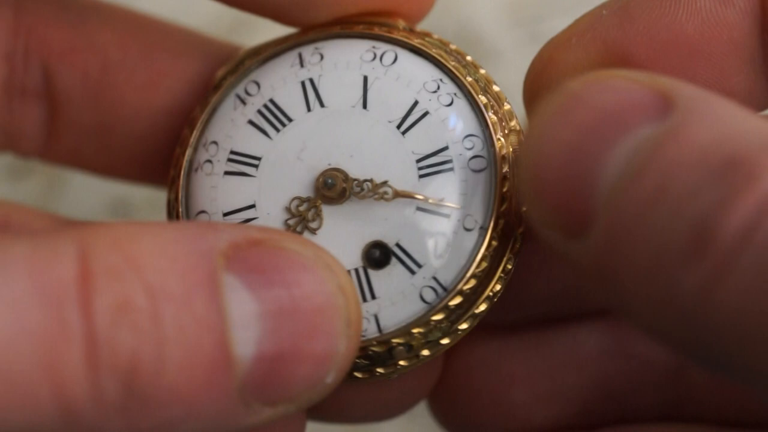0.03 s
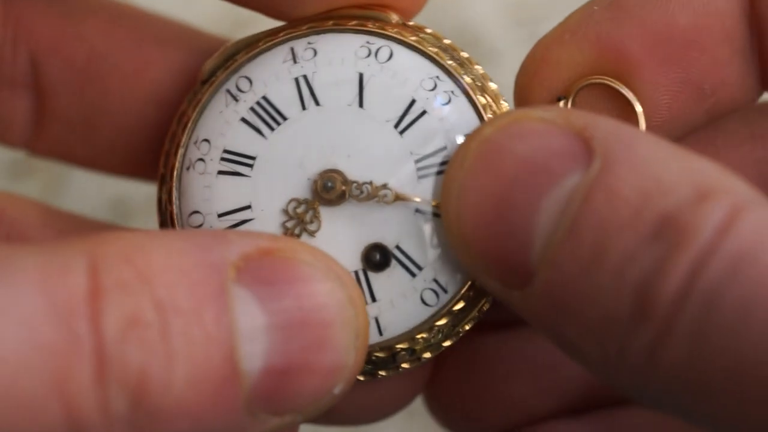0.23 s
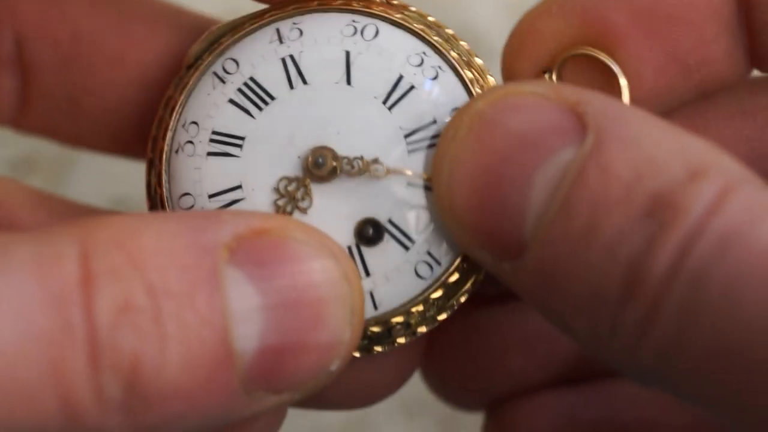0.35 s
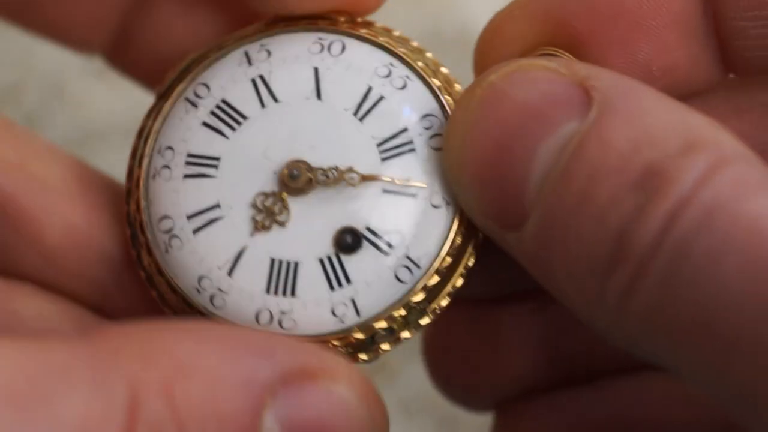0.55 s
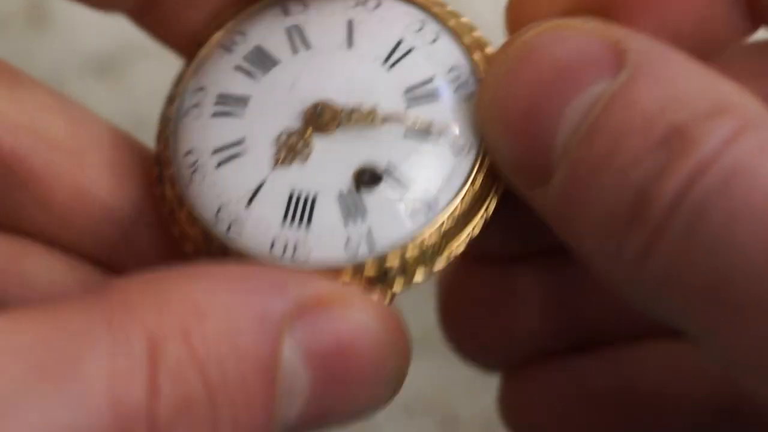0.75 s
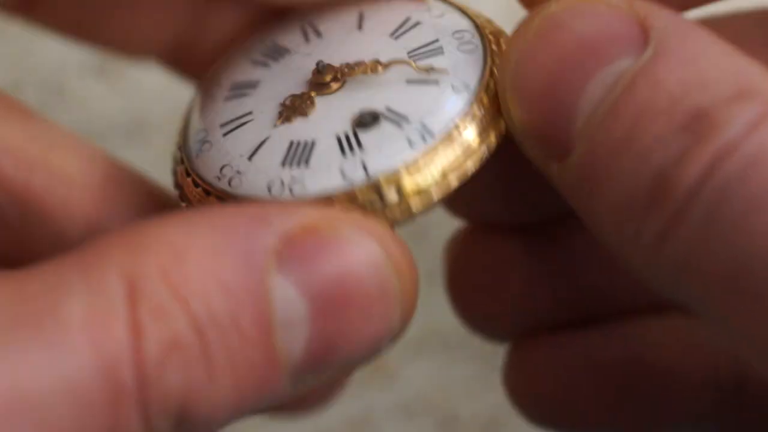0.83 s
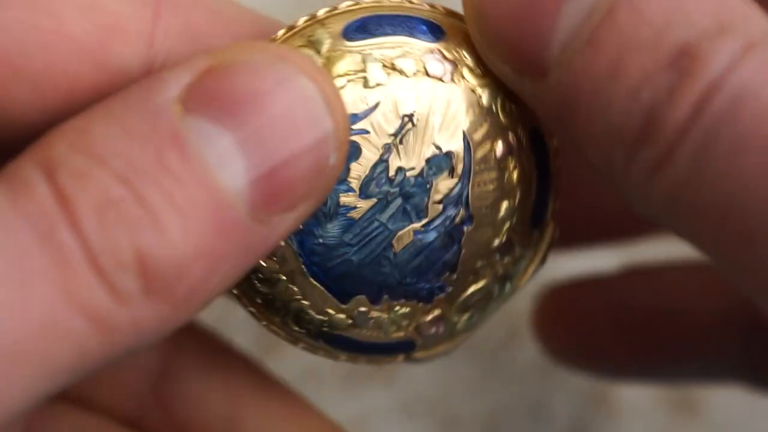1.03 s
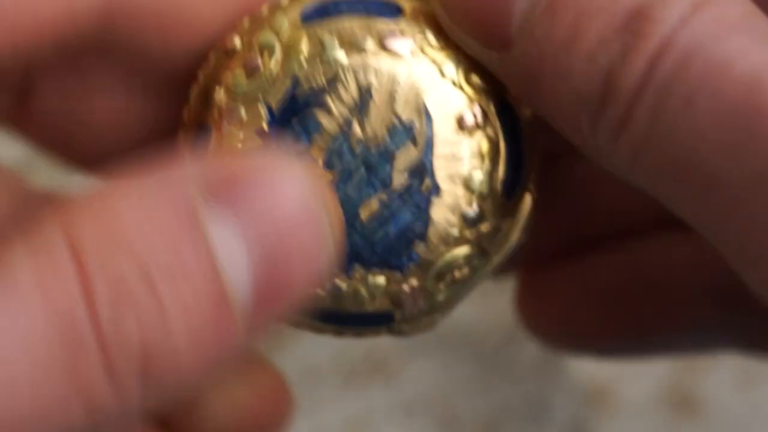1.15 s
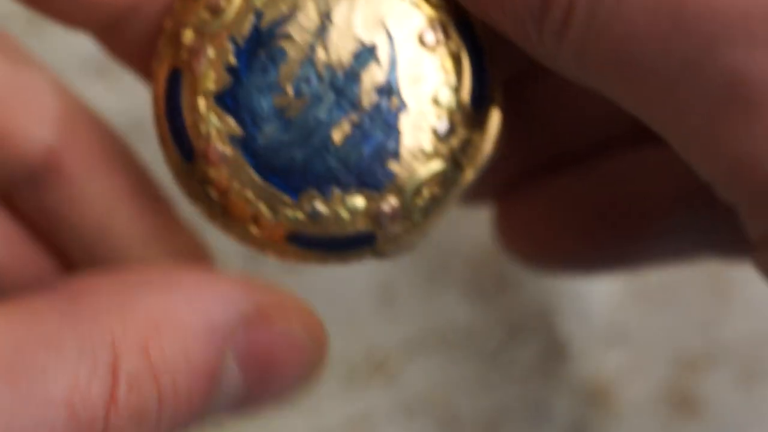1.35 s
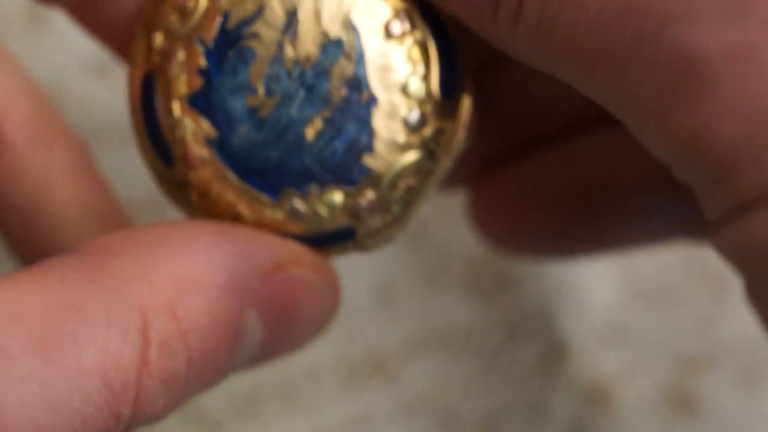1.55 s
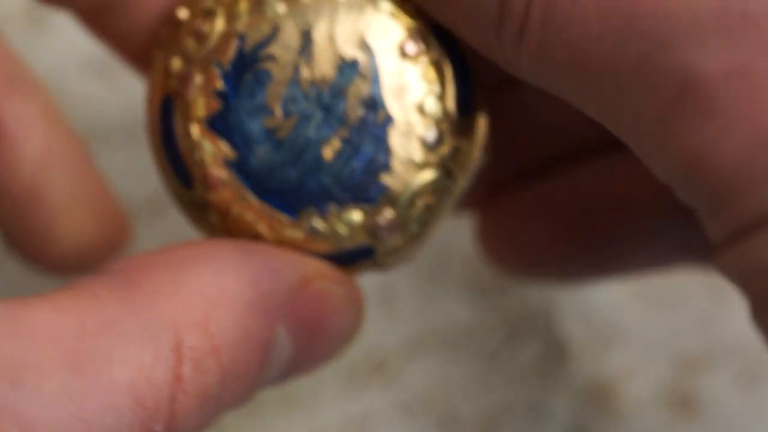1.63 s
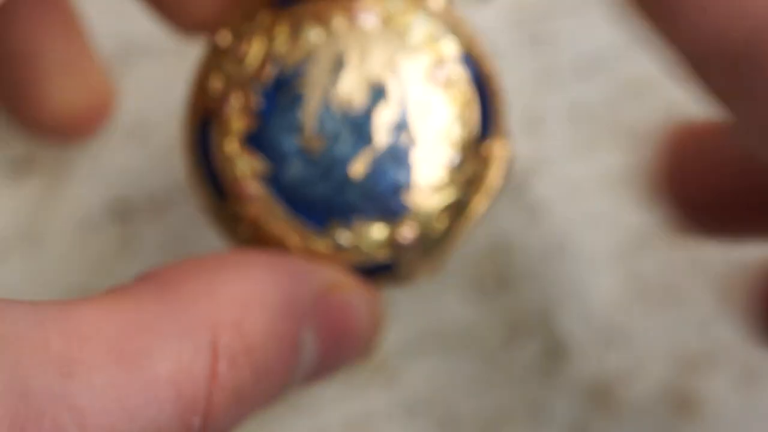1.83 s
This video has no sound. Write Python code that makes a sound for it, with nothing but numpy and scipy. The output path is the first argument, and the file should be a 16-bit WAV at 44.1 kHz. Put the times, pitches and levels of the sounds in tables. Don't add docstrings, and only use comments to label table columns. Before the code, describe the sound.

One crisp watch-case snap close to the microphone in a quiet indoor room, then near silence with soft hiss, delicate metallic ticks around the middle, and a small rim knock with skin rubbing at the end.

```python
import sys
import numpy as np
from scipy import signal
from scipy.fft import rfft, irfft
from scipy.io import wavfile
from scipy.ndimage import uniform_filter1d

SR = 44100
rng = np.random.default_rng(int(sys.argv[2]) if len(sys.argv) > 2 else 0)


def waveform_to_disk(signal):
    frames = np.transpose(np.atleast_2d(signal))
    scaled = np.clip(frames, -1, 1) * 32767
    samples = np.round(scaled).astype(np.int16)
    wavfile.write(sys.argv[1], SR, samples)


def volts_from_decibels(level):
    exponent = np.asarray(level, float) / 20
    return 10 ** exponent


N = 83790

# (frequency [Hz], width [Hz], level [dB])
CASE_MODES = [(670, 112, 3.5), (1050, 95, -19), (1530, 81, -7.5), (1760, 110, 1), (2680, 180, -9),
              (3440, 480, -13), (3664, 320, 1), (4700, 250, -10), (5250, 76, -4.5), (6660, 95, -4.5),
              (7370, 200, -1.5), (8730, 760, -3), (9200, 560, -1), (810, 160, -16)]
GLASS_MODES = [(4100, 500, -2), (10400, 600, 0), (11700, 500, 2), (13300, 700, -2), (15300, 600, -3)]
CATCH_MODES = [(8070, 190, -7), (7970, 270, 1), (8940, 400, 7), (10250, 240, -5), (12600, 560, -5),
               (14000, 500, -6), (5000, 1300, -3.5)]
BOW_MODES = [(5800, 440, 6.5), (6700, 310, 5), (7500, 310, 8), (8250, 410, 4.5), (9340, 170, 1.5),
             (10000, 200, 2), (10700, 460, 1), (11700, 190, 3), (12200, 790, -12), (14600, 1100, 7)]
CROWN_MODES = [(1600, 330, -4), (3500, 550, -1), (4750, 300, -1), (6600, 390, 5), (7660, 250, 5),
               (9000, 250, 3), (10200, 320, 0.5), (13200, 370, 0), (14200, 300, -5)]
RIM_MODES = [(3920, 130, -8), (5610, 350, -2), (6500, 550, 3), (7250, 350, 2), (8730, 400, -2),
             (4750, 300, -7), (2900, 1400, -10), (9800, 600, -2), (11200, 800, 1), (13000, 700, -1),
             (14800, 800, 5), (15500, 600, 1)]
BODY_MODES = [(1320, 200, -1), (1780, 300, 4), (3500, 350, 7), (4000, 300, 5)]
SHELL_MODES = [(950, 250, 0), (1650, 600, 1), (2350, 600, 2)]
LOOP_MODES = [(5720, 14, 3), (9100, 70, -3)]
PIN_MODES = [(7465, 26, 2), (11500, 70, -4), (10100, 70, -6), (6650, 80, -4), (3700, 120, -5)]

# (time [s], strength [dB], left minus right [dB])
CASE_HITS = [
    (.22056, -20.5, 0),
    (.2222, -28, 4),
    (.224, -35, 5),
]
GLASS_HITS = [
    (.22056, -36, 0),
    (.2222, -34, -3),
    (.223, -38, -3),
    (.224, -42, 0),
    (.2272, -44, 0),
]
CATCH_HITS = [
    (.0147, -48, 0),
    (.0167, -49, -1),
    (.2185, -58, 0),
    (1.8404, -59, 0),
]
BOW_HITS = [(1.041, -66, 0), (1.0464, -59, -3), (1.0473, -60, 0), (1.0482, -57, 0), (1.0491, -61, 0),
            (1.05, -62, 0), (1.0525, -65, 0), (1.0553, -50, -3), (1.0562, -52, -3), (1.0571, -52, 4),
            (1.0585, -58, 0), (1.06, -53, -2), (1.0616, -54, 2), (1.063, -57, -2), (1.065, -61, 0),
            (1.068, -63, 0), (1.188, -65, 0), (1.1905, -63, 0), (1.1925, -65, 0), (1.1945, -63, 0),
            (1.1968, -67, 0), (1.1995, -66, 0), (1.203, -68, 0)]
CROWN_HITS = [
    (1.7508, -53, .5),
    (1.7525, -57, 0),
    (1.7545, -60, 0),
    (1.761, -64, 0),
]
RIM_HITS = [
    (1.8422, -36, -3),
    (1.8429, -46, -3),
    (1.8437, -41, 0),
    (1.8443, -46, 2),
    (1.8459, -50, 0),
    (1.8479, -54, 0),
    (1.853, -58, 0),
    (1.857, -59, 0),
    (1.863, -61, 0),
    (1.8985, -61, 0),
]
# the first five rim modes, none above 9 kHz
RIM_SETTLE_HITS = [
    (1.845, -45, 2),
    (1.8459, -43, 4),
    (1.8468, -47, 0),
    (1.8479, -48, -1),
    (1.849, -50, 0),
    (1.8515, -54, 0),
    (1.8545, -56, 1),
    (1.8835, -56, 0),
    (1.8875, -58, 0),
]
BODY_HITS = [
    (1.0464, -56, -3),
    (1.0474, -58, 0),
    (1.0488, -56, 0),
    (1.0553, -64, 0),
    (1.06, -64, 0),
    (1.187, -67, 0),
    (1.1905, -66, 0),
    (1.1935, -67, 0),
    (1.199, -66, 0),
]
SHELL_HITS = [
    (.0152, -59, 0),
    (.0175, -62, 0),
    (.0195, -55, 0),
    (.023, -59, 0),
    (.028, -63, 0),
    (.032, -65, 0),
]
LOOP_HITS = [
    (1.0553, -58, 0),
]
PIN_HITS = [
    (1.189, -58, 0),
    (1.1945, -64, 0),
]

# (delay [s], level [dB], left minus right [dB])
ECHOES = [
    (.0035, -13, 11),
    (.007, -25.5, 15),
    (.0095, -39, -22),
    (.0135, -39.5, -31),
    (.019, -23, -8),
]
# (frequency [Hz], t60 [s])
ROOM_T60 = [(200, 0.38), (800, 0.37), (2000, 0.52), (4000, 0.39), (5500, 0.4), (9000, 0.34), (15000, 0.18)]
# (frequency [Hz], level [dB])
TICK_TAIL_TONE = [(200, -6), (800, -6), (1500, -6), (4000, -4), (7000, 0), (9000, -3), (15000, 0)]
# (frequency [Hz], density [dB per Hz])
SNAP_TAIL_TONE = [(150, -40), (450, -5.5), (650, -1), (900, 2), (1300, -9.5), (2500, -8.5), (5500, -6),
                  (8500, -11), (16000, -16.5)]
# (frequency [Hz], left-right likeness [-1..1])
ROOM_LIKENESS = [(60, 0.99), (240, 1), (950, 0.82), (3770, 0.093), (15000, 0.82)]

# (time [s], level [dB])
RUB_LEVEL = [(1.74, -78), (1.766, -64), (1.782, -67.5), (1.812, -60.5), (1.888, -59.5), (1.9, -66)]
# (frequency [Hz], density [dB per Hz])
RUB_TONE = [(400, -37), (800, -9), (1100, -6), (1350, -2), (1700, -6), (2600, -15), (5000, -13.5),
            (9000, -22.5)]
# (time [s], length [s], frequency [Hz], level [dB])
BUMPS = [(1.765, 0.045, 150, -55), (1.805, 0.022, 150, -52), (1.865, 0.018, 300, -59),
         (1.43, 0.035, 160, -54), (1.2, 0.06, 155, -57), (1.24, 0.08, 150, -60), (1.43, 0.041, 87, -60),
         (1.385, 0.026, 180, -55), (0.56, 0.2, 74, -62), (0.33, 0.07, 35, -57), (0.86, 0.08, 32, -57),
         (1.01, 0.07, 35, -59)]
# (frequency [Hz], density [dB per Hz])
FLOOR_TONE = [(12, -5), (20, -8.5), (81, -5), (177, -11.5), (285, -14), (377, -15.5), (472, -17.5),
              (542, -19.5), (16000, -32)]
# (frequency [Hz], left-right likeness [-1..1])
FLOOR_LIKENESS = [(40, 0.99), (100, 1), (200, 0.88), (400, 0.5), (800, 0.18), (1600, 0.058), (5000, 0.026),
                  (15000, 0.57)]

SNAP_S = .22045


def lid():
    out = part(CASE_MODES, CASE_HITS[:1], loose=0)
    out += part(CASE_MODES, CASE_HITS[1:], loose=0.7)
    out += part(GLASS_MODES, GLASS_HITS)
    crack_s, rebound_s = .00012, .0003
    pulses = [(SNAP_S, -1, -5, crack_s), (SNAP_S + crack_s, 1, -20, rebound_s)]
    for start_s, sign, level_db, length_s in pulses:
        t = np.arange(0, length_s, 1 / SR)
        add(out, start_s, sign * volts_from_decibels(level_db) * pair(-1.3) * np.sin(np.pi * t / length_s))
    return out


def fittings():
    parts = [(BODY_MODES, BODY_HITS), (SHELL_MODES, SHELL_HITS), (CATCH_MODES, CATCH_HITS),
             (BOW_MODES, BOW_HITS), (CROWN_MODES, CROWN_HITS), (RIM_MODES, RIM_HITS),
             (RIM_MODES[:5], RIM_SETTLE_HITS), (LOOP_MODES, LOOP_HITS), (PIN_MODES, PIN_HITS)]
    return sum(part(modes, hits) for modes, hits in parts)


def part(modes, hits, loose=0.89):
    detune_widths, scatter_db, spread_rad, rise_s = .25, 2.2, 1.5, .0001
    out = np.zeros((2, N))
    t = np.arange(6000) / SR
    hz, width_hz, mode_db = np.transpose(modes)[:, :, None]
    for start_s, hit_db, pan_db in hits:
        u = rng.standard_normal((len(modes), 4))
        mode_hz = hz + loose * detune_widths * width_hz * u[:, 3:]
        phase = 2 * np.pi * mode_hz * t + np.pi * loose * u[:, :1]
        mic_shift = spread_rad * u[:, 1:2] * np.minimum(hz / 6000, 1)
        rise = 1 - np.exp(-t / (loose * rise_s + 1e-6))
        decay = np.exp(-np.pi * width_hz * t)
        level = volts_from_decibels(mode_db + scatter_db * loose * u[:, 2:3]) * np.sqrt(width_hz / 200)
        fade = level * decay * rise
        ring = np.array([(fade * np.sin(phase + k * mic_shift)).sum(0) for k in (.5, -.5)])
        add(out, start_s, volts_from_decibels(hit_db) * pair(pan_db) * ring)
    return out


def room(snap, ticks):
    early = np.zeros((2, 2000))
    for k, (delay_s, level_db, pan_db) in enumerate(ECHOES):
        add(early, delay_s, (-1) ** k * volts_from_decibels(level_db) * pair(pan_db) * np.hanning(7)[None] / 3)
    out = signal.fftconvolve(snap + ticks, early, axes=1)[:, :N]
    tick_tail = tail(TICK_TAIL_TONE, level_db=-12.5)
    out += signal.fftconvolve(ticks.mean(0)[None], tick_tail, axes=1)[:, :N]
    add(out, SNAP_S, tail(SNAP_TAIL_TONE, level_db=-4.5))
    return out


def tail(tone, level_db):
    frames, start_s = 400, .004
    hz = np.fft.rfftfreq(256, 1 / SR)
    t = np.arange(frames) * 64 / SR
    decay_db = read(tone, hz)[:, None] - 60 * t / read(ROOM_T60, hz)[:, None]
    z = noise(frames, size=256, same=ROOM_LIKENESS) * volts_from_decibels(decay_db)
    out = signal.istft(z, nperseg=256, noverlap=192)[1]
    out = out * np.clip(np.arange(out.shape[1]) / SR / start_s - .5, 0, 1)
    return volts_from_decibels(level_db) * out / np.linalg.norm(out[0])


def rub():
    frames, grain_db = N // 64 + 5, 2
    hz = np.fft.rfftfreq(256, 1 / SR)
    grain = evened(uniform_filter1d(rng.standard_normal(frames), size=4))
    z = noise(frames, size=256, same=ROOM_LIKENESS)
    z = z * volts_from_decibels(read(RUB_TONE, hz)[:, None] + grain_db * grain)
    slide = evened(signal.istft(z, nperseg=256, noverlap=192)[1][:, :N])
    time_s, level_db = np.transpose(RUB_LEVEL)
    return volts_from_decibels(np.interp(np.arange(N) / SR, time_s, level_db, left=-120)) * slide


def hands():
    out = np.zeros((2, N))
    for start_s, length_s, hz, level_db in BUMPS:
        t = np.arange(0, length_s, 1 / SR)
        swell = np.sin(np.pi * t / length_s) ** 2.4
        thud = np.sin(2 * np.pi * hz * t * (1.08 - 0.051 * t / length_s))
        add(out, start_s, volts_from_decibels(level_db) * pair(0) * swell * thud)
    return out


def floor():
    frames = N // 512 + 5
    hz = np.fft.rfftfreq(2048, 1 / SR)
    lumps = rng.standard_normal((frames, len(hz))).T
    lumps = uniform_filter1d(lumps, size=4, axis=0)
    lumps = evened(uniform_filter1d(lumps, size=5, axis=1))
    lump_db = lumps * (1.46 + 2.37 / (1 + hz[:, None] / 300))
    z = noise(frames, size=2048, same=FLOOR_LIKENESS) * volts_from_decibels(read(FLOOR_TONE, hz)[:, None] + lump_db)
    return volts_from_decibels(-58) * evened(signal.istft(z, nperseg=2048, noverlap=1536)[1][:, :N])


def noise(frames, size, same):
    a, b, c, d = rng.standard_normal((frames, size // 2 + 1, 4)).T
    like = np.clip(read(same, np.fft.rfftfreq(size, 1 / SR)), -1, 1)[:, None]
    mid = (a + 1j * b) * np.sqrt((1 + like) / 2)
    side = (c + 1j * d) * np.sqrt((1 - like) / 2)
    return np.array([mid + side, mid - side])


def evened(x):
    return x / np.sqrt(np.mean(x ** 2) + 1e-20)


def read(points, hz):
    f, value = np.transpose(points)
    return np.interp(np.log(hz + 1), np.log(f + 1), value)


def add(mix, start_s, sound):
    span = mix[:, round(start_s * SR):][:, :sound.shape[1]]
    span += sound[:, :span.shape[1]]


def pair(pan_db):
    return volts_from_decibels(np.array([[.5], [-.5]]) * pan_db)


def scene():
    steady = floor() + rub() + hands()
    small_case = signal.butter(2, 303, "high", fs=SR)
    snap = signal.lfilter(*small_case, lid())
    ticks = fittings()
    return snap + ticks + room(snap, ticks) + steady


def low_pass(x):
    return signal.sosfilt(signal.butter(12, 17140, fs=SR, output="sos"), x)


def record(dry):
    hz = np.fft.rfftfreq(N, 1 / SR)
    edge = volts_from_decibels(-30 * np.clip((hz - 15750) / 250, 0, 1))
    mix = irfft(rfft(dry, axis=1) * edge, N, axis=1)
    return low_pass(mix)


dry = scene()
out = record(dry)
waveform_to_disk(out)
```